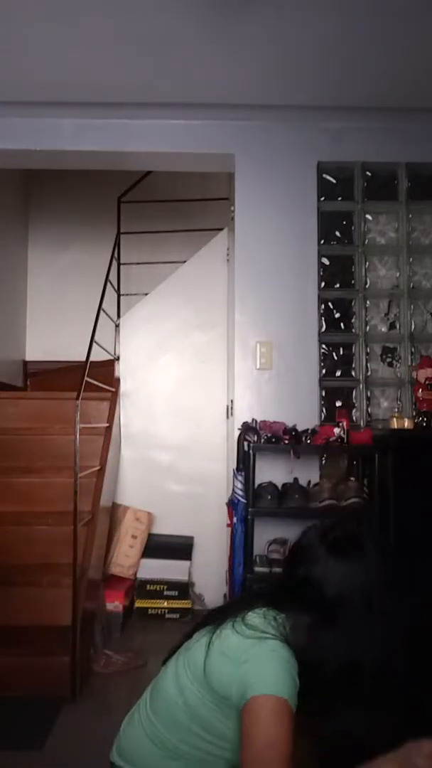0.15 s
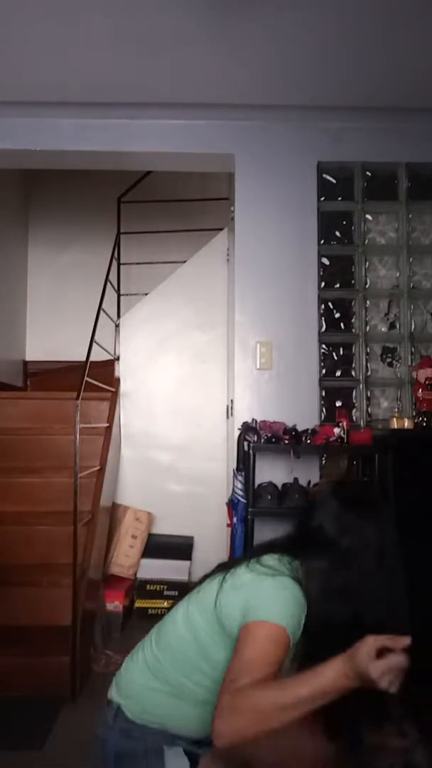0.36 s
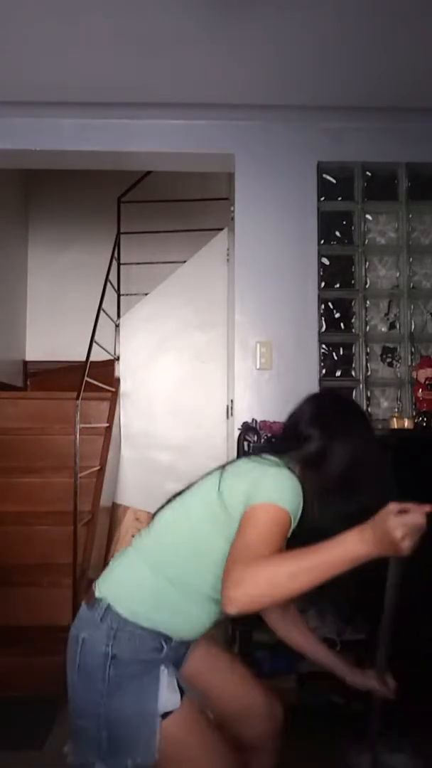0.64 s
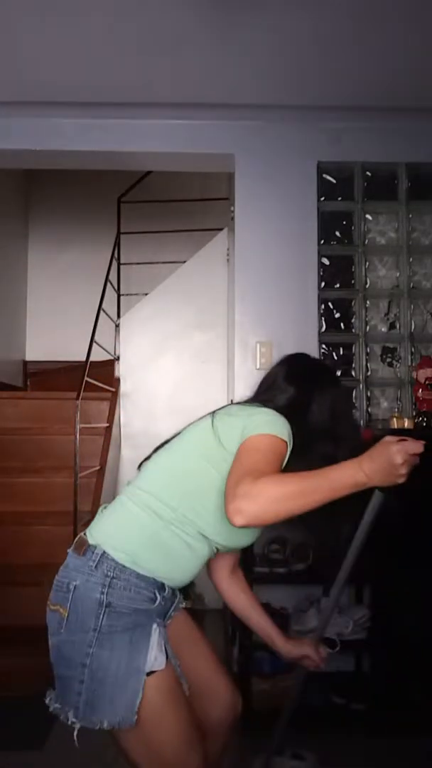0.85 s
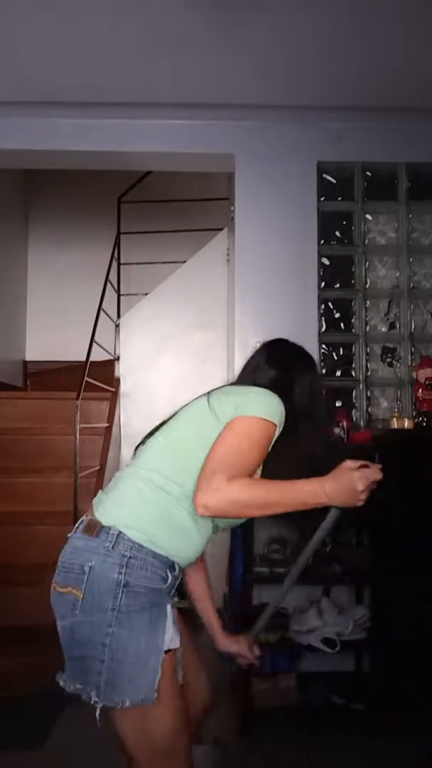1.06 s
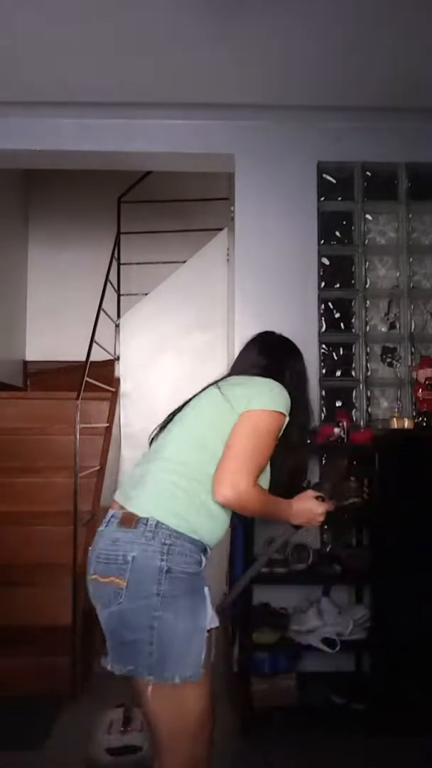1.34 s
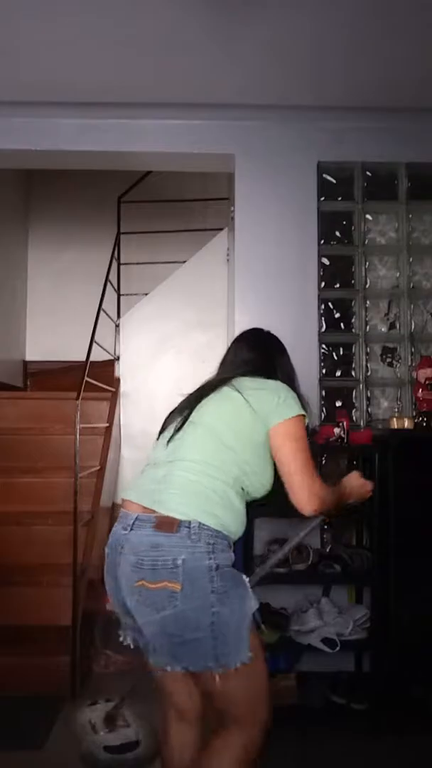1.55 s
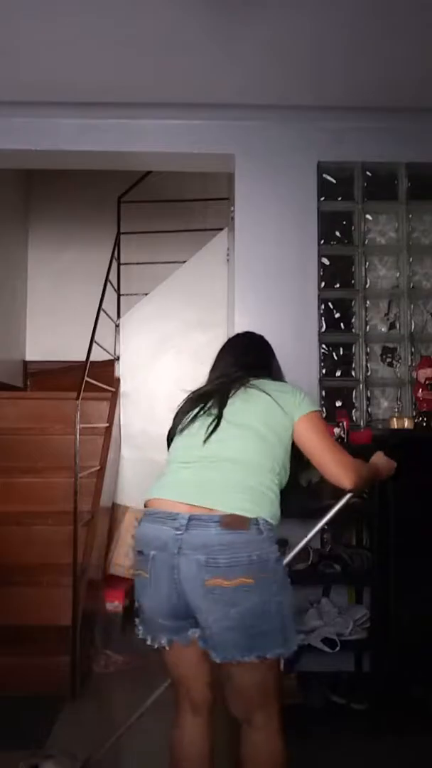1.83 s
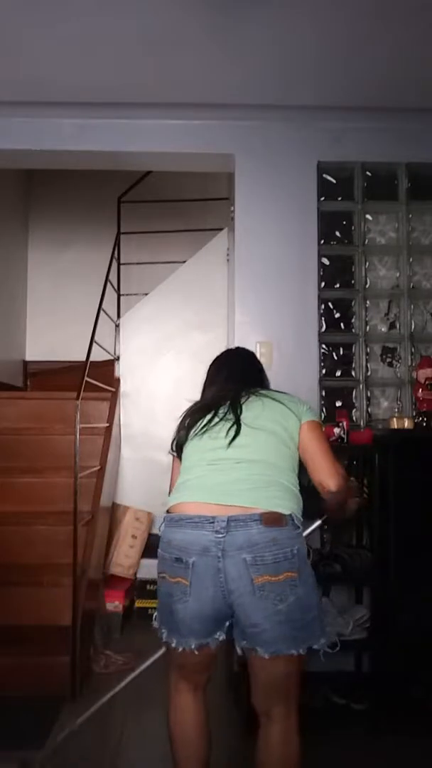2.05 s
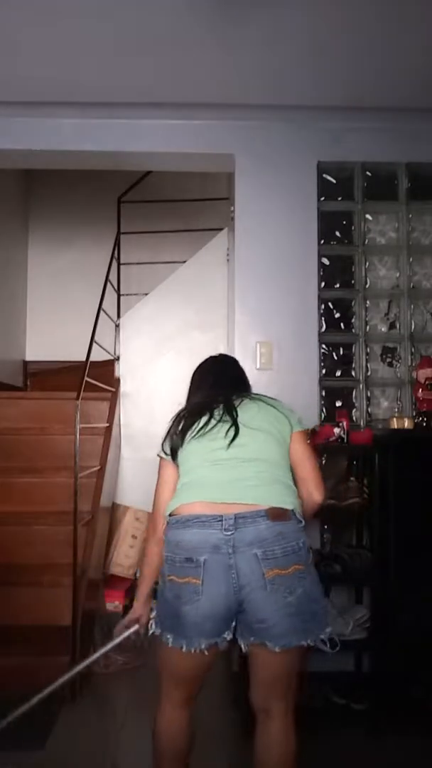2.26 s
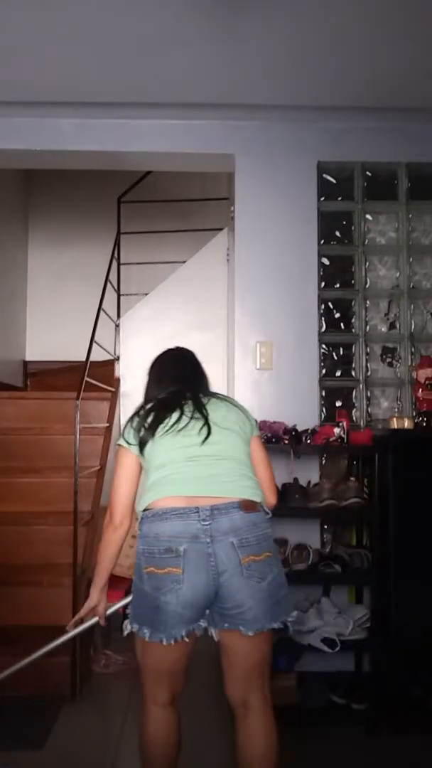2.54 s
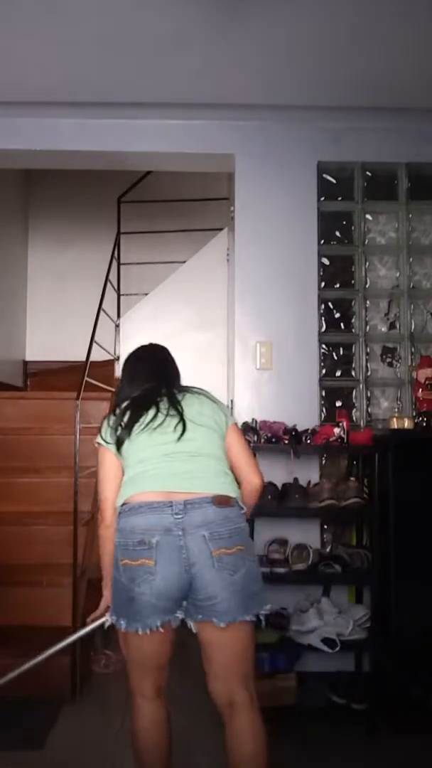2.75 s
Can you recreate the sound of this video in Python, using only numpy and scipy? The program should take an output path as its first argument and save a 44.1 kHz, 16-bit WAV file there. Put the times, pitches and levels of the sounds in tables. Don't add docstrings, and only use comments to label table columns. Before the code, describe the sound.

Mop pushed to and fro on a tiled floor, with sharp knocks, gritty scuffs and shrill squeaks

```python
import sys
import numpy as np
from scipy import signal
from scipy.fft import rfft, irfft, next_fast_len
from scipy.io import wavfile
from scipy.ndimage import uniform_filter1d

SR = 44100
rng = np.random.default_rng(int(sys.argv[2]) if len(sys.argv) > 2 else 0)


def master_out(mix):
    frames = np.transpose(np.atleast_2d(mix))
    ceiling = np.clip(frames, -1, 1)
    pcm = np.round(ceiling * 32767).astype(np.int16)
    wavfile.write(sys.argv[1], SR, pcm)


def level_to_linear(level):
    exponent = np.asarray(level, float) / 20
    return 10 ** exponent


N = 127890

ROOM_FILL_S = 0.026


def unit(x):
    return x / np.sqrt(np.mean(x ** 2))


def shaped(x, gain):
    n = next_fast_len(len(x))
    f = np.arange(n // 2 + 1) * SR / n + 1e-3
    return irfft(rfft(x, n) * gain(f), n)[:len(x)]


def curve(points):
    hz, db = np.array(points, float).T
    return lambda f: level_to_linear(np.interp(np.log(f), np.log(hz), db)) / (1 + (hz[0] / f) ** 4)


def peaks(rows):
    def gain(f):
        power = 0
        for hz, width, db in rows:
            power = power + level_to_linear(2 * db) / (1 + ((f - hz * hz / f) / width) ** 2) ** 2
        return np.sqrt(power)
    return gain


def air_top(db):
    return peaks([(15000, 3900, db)])


def walk(rate):
    k = int(SR / rate)
    return unit(uniform_filter1d(uniform_filter1d(rng.standard_normal(N), k), k))


def evened(x, width_hz):
    s = rfft(x)
    power = uniform_filter1d(abs(s) ** 2, int(width_hz * len(x) / SR) + 1)
    return irfft(s / np.sqrt(power), len(x)) * np.linalg.norm(x)


def contact(t, start, length, rise):
    u = np.clip((t - start) / length, 0, 1)
    return np.sin(np.pi * u ** rise) * np.sqrt(2 + 2 * ROOM_FILL_S / length)


def house():
    # f/Hz, level/dB per Hz
    air_points = [(18, -39), (30, 2.5), (292, 2.5), (451, -3.5), (970, 2.5), (1190, 3.5), (1540, 4.5),
                  (2260, -1), (13500, -10.5)]
    colour, top = curve(air_points), air_top(-7)
    air = unit(shaped(rng.standard_normal(N), lambda f: np.hypot(colour(f), top(f))))
    hum = unit(shaped(rng.standard_normal(N), peaks([(110, 8.7, 0)])))
    return level_to_linear(-52.5 + 1.3 * walk(5)) * air + level_to_linear(-68.5) * hum


def room(x, t60_share=1):
    # f/Hz, t60/s
    decay_times = [(150, 0.33), (500, 0.55), (1500, 0.42), (4000, 0.48), (8000, 0.41), (12000, .36),
                   (16000, 0.21)]
    build_s, echo_db, early_s = 0.0023, 4.0, 0.014
    t = np.arange(SR) / SR
    echoes = rng.standard_normal(SR)
    spread = np.minimum(rng.exponential(size=SR), 4)
    echoes = echoes * level_to_linear(echo_db * spread * np.exp(-t / early_s))
    table_hz, table_t60 = np.array(decay_times).T
    tail = 0
    for hz in 62.5 * 2 ** np.arange(9):
        band = shaped(echoes, lambda f: np.cos(np.pi / 2 * np.clip(np.log2(f / hz), -1, 1)) ** 2)
        t60 = np.interp(np.log(hz), np.log(table_hz), table_t60)
        tail = tail + band * level_to_linear(-60 * t / t60_share / t60)
    tail = evened(tail * (1 - np.exp(-t / build_s)), 90) * (t < .9)
    return signal.fftconvolve(x, tail / np.linalg.norm(tail))[:N]


def joint(t):
    # [(f/Hz, level/dB)]
    squeaks = [(.379, .042, .03, -16, [(824, -30), (2450, -52), (9500, -52)]),
               (.398, .03, .1, -16, [(868, -33)]), (.424, .065, .008, -14, [(920, -32), (1820, -43)]),
               (.676, .03, -.06, -3, [(285, -44), (624, -43), (850, -46)]),
               (.494, .032, .06, -16, [(900, -42)]), (.525, .095, -.005, -18, [(918, -42)]),
               (.7, .08, .04, -3, [(1860, -52), (1560, -48)]), (.851, .02, -.01, -8, [(3130, -39),
               (6170, -36), (9300, -42)]), (.8675, .003, .002, -12, [(6200, -24)]),
               (.861, .0065, -.01, -6, [(6135, -19), (9250, -38), (12200, -46), (15100, -42)]),
               (.873, .004, .02, -10, [(6300, -19), (9700, -37)]), (.9, .05, -.003, -18, [(2069, -34)]),
               (.935, .045, .001, -18, [(2069, -40)]), (.975, .08, .001, -18, [(2069, -46)]),
               (.908, .014, .002, -12, [(6132, -27)]), (.977, .006, .002, -20, [(6150, -36)]),
               (1.319, .022, -.005, -10, [(5110, -48), (7800, -57)]),
               (1.338, .024, -.005, -10, [(5020, -46), (7700, -58)]),
               (1.522, 0.043, -0.025, 5, [(8575, -23), (6130, -40), (13500, -37)]),
                     (1.524, 0.043, -0.006, 0, [(11085, -17.5)]), (1.555, 0.028, -0.002, 0, [(11070, -19)]),
                     (1.577, 0.042, 0.001, -5, [(11060, -24.5)]), (1.746, 0.022, 0.002, -10, [(6700, -47)]),
                     (1.525, 0.07, -0.053, -9, [(11360, -33), (14700, -43)]),
                     (1.535, 0.06, -0.02, -3, [(2520, -52), (2950, -54)]),
                     (0.95, 0.26, -.03, 4, [(1560, -56), (1800, -59)]),
                     (1.572, 0.078, -0.18, -3, [(1560, -49.5)]),
                     (1.978, 0.048, -0.0079, -14, [(1590, -39)]), (2.66, 0.022, 0.003, -10, [(5108, -45)]),
                     (2.683, 0.02, 0.003, -10, [(5108, -44)]), (2.703, 0.014, 0.003, -10, [(5108, -46)]),
                     (2.639, 0.031, -0.004, -10, [(5112, -37), (10220, -49)]),
                     (2.738, 0.022, 0.003, 4, [(5110, -52), (10220, -70)]),
                     (2.752, 0.016, -0.011, -7, [(11385, -18.5)]),
                     (2.765, 0.009, -0.002, -3, [(11345, -16.5)]),
                     (2.772, 0.023, -0.002, -1, [(11365, -12)]), (2.611, 0.027, .02, -9, [(780, -40)]),
                     (2.852, 0.071, -0.071, -12, [(290, -35.5), (730, -39)]),
                     (2.886, 0.012, 0.009, -3, [(6060, -25)])]
    wobble = 0.0015 * walk(151)
    flutter = level_to_linear(1.5 * walk(240))
    near, far = 0, 0
    for start, length, glide, room_db, lines in squeaks:
        bend = glide * np.clip((t - start) / length - .5, -1, 1)
        turns = np.cumsum(1 + wobble + bend) / SR
        tones = sum(level_to_linear(db) * np.sin(2 * np.pi * hz * turns) for hz, db in lines)
        squeak = flutter * contact(t, start, length, 0.74) * tones
        near = near + squeak
        far = far + level_to_linear(room_db) * squeak
    return level_to_linear(-3) * near + room(far, 0.98)


def pad_colour():
    # f/Hz, level/dB per Hz
    hiss_points = [(1290, -6), (2200, -13), (2720, -13), (2890, -8), (4700, -2), (5190, -5.5), (6460, 0),
                   (8630, -8), (13500, -16.5)]
    # f/Hz, width/Hz, level/dB
    plate_rings = [(3736, 250, -5), (4550, 190, -2.5), (6560, 1040, -5), (7450, 230, -5), (8580, 820, -6.5)]
    hiss, top, rings = curve(hiss_points), air_top(-13), peaks(plate_rings)
    return lambda f: np.hypot(np.hypot(hiss(f), top(f)), rings(f))


def rubbed(gain, strokes, column):
    span = 16384
    noise = rng.standard_normal(N + span)
    grain = np.resize(walk(4000), N + span)
    grit = unit(noise * level_to_linear(8.5 * grain))
    push = np.zeros(N + span)
    for row in strokes:
        i = max(int(row[0] * SR) - span // 16, 0)
        shape = contact((i + np.arange(span)) / SR, row[0], row[1], 0.44)
        burst = evened(grit[i:i + span] * shape, 280)
        gate = np.minimum(uniform_filter1d(shape, size=64) / shape.max() * 4, 1)
        push[i:i + span] += level_to_linear(row[column]) * burst * gate
    return shaped(push[:N], gain) / np.std(shaped(grit, gain))


def mop(t):
    # t/s, contact length/s, pad hiss/dB, head clack/dB, floor thud/dB
    slaps = [(.0, 0.0054, -34.5, -28.5, -43.5), (.049, 0.0029, -70, -28, -37.5),
             (0.082, 0.037, -69, -59, -47.5), (0.129, 0.012, -37, -37.5, -73),
             (0.133, 0.0092, -25, -34, -68), (0.358, 0.021, -47, -49.5, -54.5),
             (0.383, 0.0069, -30, -42, -62), (0.399, 0.018, -36, -43.5, -57),
             (0.418, 0.011, -24.5, -55, -64), (0.435, 0.015, -27, -41.5, -62),
             (0.445, 0.031, -34, -44, -68), (.475, 0.0062, -29, -35.5, -54),
             (0.564, 0.011, -43, -36.5, -57), (0.571, 0.0037, -36, -35, -68),
             (0.681, 0.0076, -57, -47.5, -52.5), (.863, 0.0077, -24, -35.5, -67),
             (0.871, 0.0052, -25, -69, -62), (0.9, 0.05, -33, -41, -53), (1.2, .15, -54, -60, -60),
             (1.36, 0.0048, -28.5, -25, -42.5), (1.367, 0.01, -18.5, -48, -53),
             (1.566, 0.026, -68.5, -44, -85), (1.656, 0.017, -50.5, -45.5, -75),
             (1.756, 0.0045, -19.5, -35, -71), (1.761, 0.014, -20.5, -56, -77.5),
             (1.839, 0.0058, -23, -21, -50), (2.003, 0.0047, -16, -23.5, -46.5),
             (2.047, 0.014, -27, -37.5, -53.5), (2.609, 0.019, -40.5, -30, -37.5),
             (2.775, 0.021, -31, -29.5, -59), (2.808, 0.019, -17, -22, -41),
             (2.845, 0.044, -27.5, -31.5, -37.5)]
    scuffs = [
        (0.54, 0.1, -76, -61, -62),
        (0.678, 0.22, -60.5, -55, -59),
        (1.295, 0.14, -47.5, -60, -74),
        (2.281, 0.25, -64, -61.5, -66),
        (1.54, 0.083, -47.5, -57, -91),
        (2.7, 0.13, -60.5, -53, -54.5),
        (2.45, 0.45, -60, -64, -65.5),
        (0.935, 0.28, -65, -51.5, -60),
    ]
    # f/Hz, width/Hz, level/dB
    head_modes = [(657, 300, -8), (830, 410, -4), (1150, 520, -5), (1540, 500, 1), (1830, 370, 3),
                  (2360, 610, -3.5), (3500, 1300, -3.5)]
    # f/Hz, width/Hz, level/dB
    thud_modes = [(165, 40, -10), (305, 120, 5), (430, 160, 1), (520, 160, -1)]
    # t/s, pad treble/dB, head bottom/dB
    facing_steps = [(0, -2, 6.5), (.13, -40, -3.5), (.4, -1, 14), (.57, -11, -14.5), (.69, 12, 14),
                    (.86, 8.5, -1), (1.249, -21, 1), (1.362, 5.5, 9), (1.57, 10.5, -12), (1.66, 8, 12.5),
                    (1.753, 0.5, 11.5), (1.84, 3.5, -1.5), (2.0, 4.5, 3), (2.402, 22, 12), (2.61, -4, 0),
                    (2.72, 16.5, 0), (2.78, -4.5, -8), (2.86, -1, 2)]
    strokes = slaps + scuffs
    pad = rubbed(pad_colour(), strokes, 2)
    head = rubbed(peaks(head_modes), strokes, 3)
    thud = rubbed(peaks(thud_modes), strokes, 4)
    treble = shaped(pad, lambda f: 1 / (1 + (8120 / f) ** 6))
    bottom = shaped(head, lambda f: 1 / (1 + (f / 1010) ** 6))
    turn_s, treble_db, bottom_db = np.array(facing_steps).T
    treble_change = level_to_linear(np.interp(t, turn_s, treble_db)) - 1
    bottom_change = level_to_linear(np.interp(t, turn_s, bottom_db)) - 1
    return pad + head + thud + treble * treble_change + bottom * bottom_change


def scene():
    t = np.arange(N) / SR
    strokes = mop(t)
    direct = level_to_linear(-9) * strokes
    return (direct + room(strokes) + joint(t) + house())[None]


def low_pass(x):
    return signal.sosfilt(signal.butter(12, 16670, fs=SR, output="sos"), x)


def record(dry):
    notch_hz, notch_width_hz, notch_depth = 13800, 600, .6
    agc_top_db, agc_slope, agc_hold_s, agc_release_s = -25, 0.24, 0.043, 0.018
    limit = .5
    x = shaped(dry[0], lambda f: 1 - notch_depth / (1 + ((f - notch_hz) / notch_width_hz) ** 2))
    heard = shaped(x, lambda f: 1 / (1 + (6600 / f) ** 2))
    power = uniform_filter1d(heard ** 2, int(agc_hold_s * SR))
    keep = np.exp(-1 / (agc_release_s * SR))
    released = signal.lfilter([1 - keep], [1, -keep], power)
    env = np.sqrt(np.maximum(power, released) + 1e-12)
    x = x * np.minimum(level_to_linear(agc_top_db) / env, 1) ** agc_slope
    x = limit * np.tanh(x / limit)
    x = signal.sosfilt(signal.ellip(8, .2, 32, 15650, fs=SR, output="sos"), x)
    return low_pass(x[None])


dry = scene()
out = record(dry)
master_out(out)
```